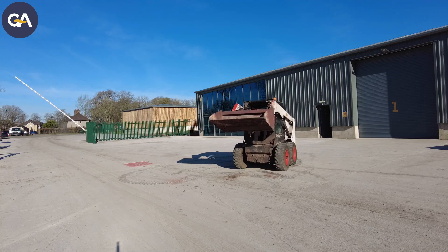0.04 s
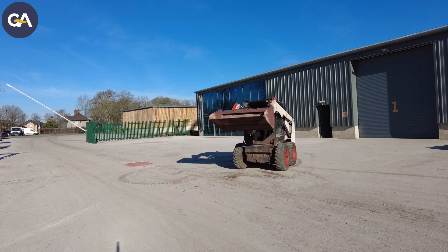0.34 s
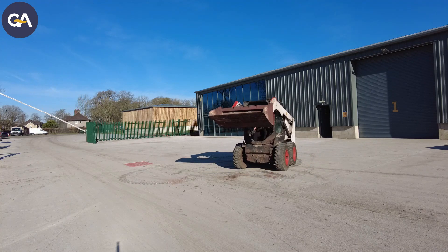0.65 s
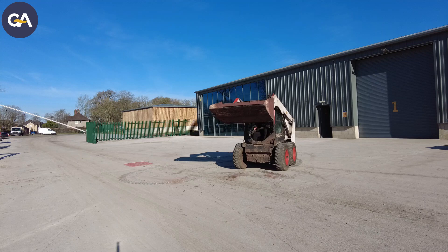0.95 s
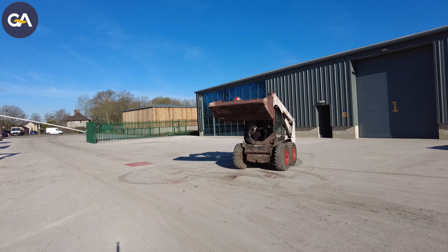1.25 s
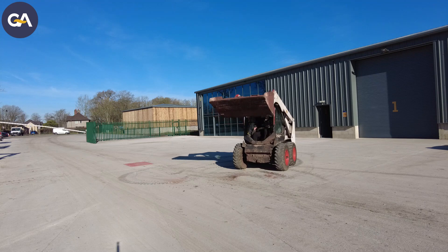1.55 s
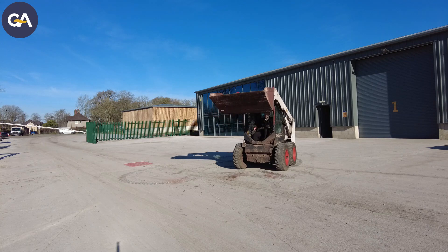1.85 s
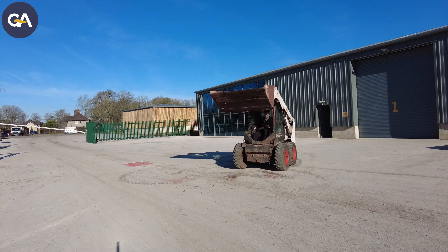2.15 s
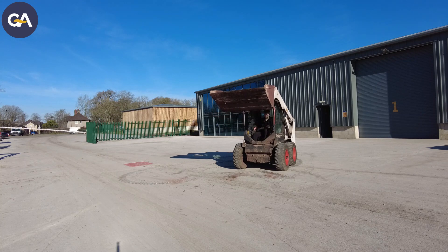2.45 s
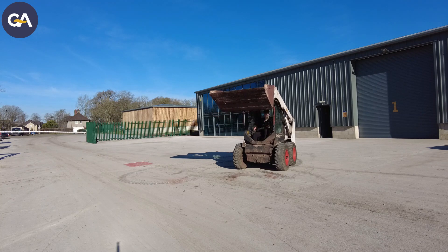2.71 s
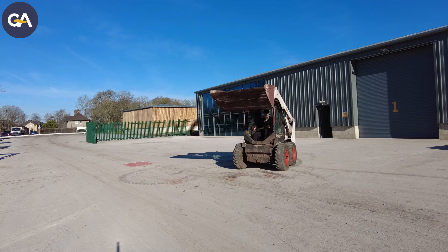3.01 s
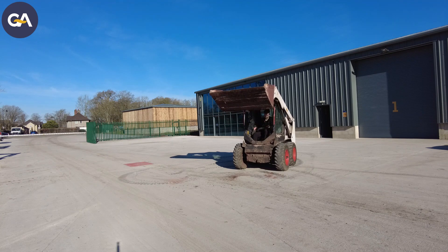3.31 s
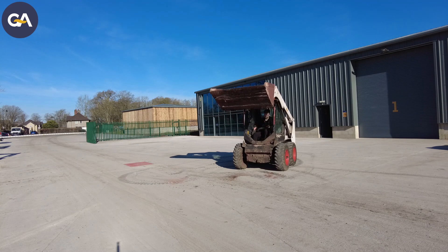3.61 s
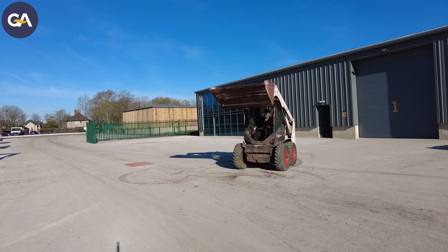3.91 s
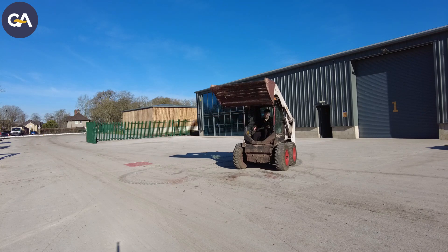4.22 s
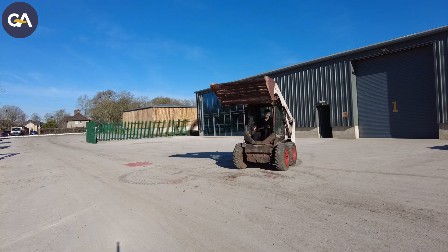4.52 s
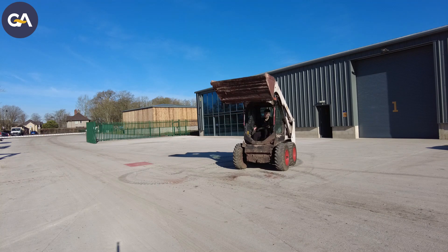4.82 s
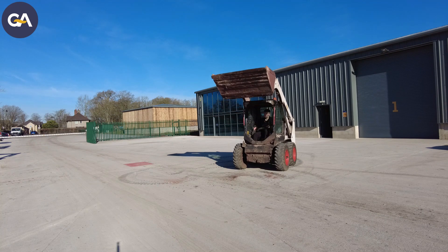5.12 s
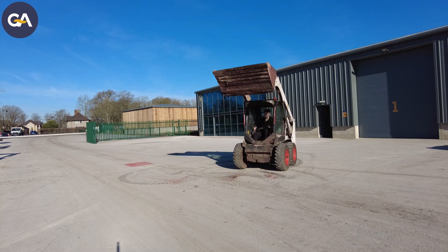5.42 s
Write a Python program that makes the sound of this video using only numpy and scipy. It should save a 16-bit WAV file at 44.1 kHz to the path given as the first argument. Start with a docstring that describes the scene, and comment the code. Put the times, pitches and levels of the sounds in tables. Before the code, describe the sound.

A diesel skid steer loader booms and revs up, its steel arms knocking and rattling before the hydraulics start to whine.

```python
"""A four-cylinder diesel skid steer lifts its bucket on a paved yard, its revs slowly climbing.
Each firing drives the exhaust's boom and the block's clatter; the boom eases as the load comes off.
The arms rattle, knock and clink against loose pins, grit ticks under the tyres and a faint hiss flickers.
Then the lift valve sings, the hydraulic pump whines and engine harmonics ring the steel panels.
A metal shed wall gives a short answer."""
import sys
import numpy as np
from scipy import signal
from scipy.fft import rfft, irfft, next_fast_len
from scipy.io import wavfile
from scipy.ndimage import uniform_filter1d, map_coordinates

SR = 44100
rng = np.random.default_rng(int(sys.argv[2]) if len(sys.argv) > 2 else 0)


def inscribe(sig):
    """Save sig as 16-bit PCM at rate SR to the path in sys.argv[1].

    A 1-D sig is mono; a 2-D sig holds one channel per row.
    Samples are clipped to [-1, 1] before scaling.
    """
    pcm = np.round(np.clip(np.atleast_2d(sig).T, -1, 1) * 32767)
    wavfile.write(sys.argv[1], SR, pcm.astype(np.int16))


N = 245195


def amp(db):
    """Decibels to gain."""
    return 10 ** (np.asarray(db) / 20)


def unit(x):
    """Scale to rms 1."""
    return x / np.sqrt(np.mean(x ** 2) + 1e-20)


def along(points, hz):
    """Read (Hz, value) points on a log frequency axis."""
    freqs, values = np.transpose(points)
    return np.interp(np.log(hz + 1), np.log(freqs + 1), values)


def automation(rows):
    """Join (seconds, value) points into one value per sample."""
    times, values = np.transpose(rows)
    return np.interp(np.arange(N) / SR, times, values)


def envelope(start, length, attack, release):
    """Rise, hold until length has passed, then die away; all in seconds."""
    t = np.arange(N) / SR - start
    return np.clip(t / attack, 0, 1) * np.exp(-np.maximum(t - length, 0) / release)


def swells(rows):
    """Bell-shaped rises of level."""
    t = np.arange(N) / SR
    return sum(amp(db) * np.exp(-((t - centre) / half) ** 2) for centre, half, db in rows)


def wobble(rate):
    """A smooth random curve, rate knots a second."""
    coarse = np.arange(0, N + 16, 16)
    curve = map_coordinates(rng.standard_normal(4096), [coarse * rate / SR], mode="wrap")
    return np.interp(np.arange(N), coarse, curve)


def filtered(x, response):
    """Filter x by a complex response of frequency."""
    size = next_fast_len(N + SR // 2)
    return irfft(rfft(x, size) * response(np.fft.rfftfreq(size, 1 / SR)), size)[..., :N]


def resonance(f, hz, width):
    """Causal response of one mode; width in Hz."""
    return 1j * f * width / (hz * hz - f * f + 1j * f * width)


# Stereo width. Each row: frequency in Hz, side level against the mid in dB.
WIDTH = [(60, -29.5), (125, -21.5), (250, -9), (500, -7), (1000, -2), (2000, -11), (4000, -1), (12000, -2)]

def spread(pair):
    """Two unrelated signals as mid and side: narrow bass, wide treble."""
    side = filtered(pair[1], lambda hz: amp(along(WIDTH, hz)))
    return np.array([pair[0] + side, pair[0] - side])


def rush(spectrum, gate):
    """Stereo noise let through by a gate, then coloured."""
    bursts = rng.standard_normal((2, N)) * gate
    return spread(unit(filtered(bursts, lambda hz: amp(along(spectrum, hz)))))


def tone(turns, drift, flutter_db, rate):
    """A sine of rms 1 whose phase (drift, in radians) and level waver."""
    phase = 2 * np.pi * (turns + rng.random()) + drift * wobble(rate)
    return unit(np.sin(phase) * amp(flutter_db * wobble(rate)))


def strokes(firings, decay, uneven_db, scatter_db):
    """A burst at each firing, its decay counted in firings; each cylinder has its own strength."""
    stroke = firings.astype(int)
    cylinder = np.array([1, -1, .5, -.5])[stroke % 4]
    size = amp(uneven_db * cylinder + scatter_db * rng.standard_normal(1024)[stroke])
    return unit(size * np.exp(-(firings % 1) / decay))


def roughness(firings, depth):
    """The shaft jerks once an engine cycle and shudders at random, which roughens a tone."""
    return unit(1 + depth * wobble(70) + depth * np.sin(2 * np.pi * firings / 4))


# The exhaust's harmonics. Each row: multiple of the four-firing cycle, relative level in dB when
# lugging, relative level in dB when running free.
ORDERS = [(2, -49, -46), (3, -39, -41), (5, -45, -44), (6, -50, -44), (7, -42, -45), (8, -30, -40.5),
          (9, -49, -41.5), (10, -51, -55), (11, -50, -47), (12, -38.5, -44), (13, -48, -49), (14, -56, -52),
          (15, -47, -51), (16, -53, -51), (17, -47.5, -56), (18, -57, -56), (19, -53, -61), (20, -53, -60),
          (21, -55, -62), (22, -54, -50), (23, -57, -62), (24, -53, -54), (26, -62, -57), (27, -56, -60),
          (28, -56, -50.5), (32, -63, -59), (33, -66, -55), (35, -66, -50), (36, -57, -55), (37, -66, -54)]
# The exhaust's noise, lugging and running free. Each row: frequency in Hz, relative level in dB.
RUMBLE_LUG = [(15, -11.5), (28, -1.5), (48, 1.5), (80, 0), (105, -1.5), (190, -2), (300, -9), (420, -9),
              (560, -12), (670, -11.5), (800, -11.5), (950, -23), (1400, -49), (3000, -75)]
RUMBLE_FREE = [(15, -12), (28, -4.5), (48, 1), (80, 0), (190, 0.5), (300, -7), (420, -9.5), (540, -12),
               (620, -12.5), (700, -9.5), (770, -7.5), (840, -23), (1400, -50), (3000, -75)]
BOOM_FREE_DB, BOOM_LUG_DB = -21, -10  # at load 0 and 1

def exhaust(firings, load):
    """Firings boom, louder and steadier under load; unequal cylinders add the whole cycle's harmonics."""
    free = np.clip(1 - load, 0, 1)
    boom_db = BOOM_FREE_DB + (BOOM_LUG_DB - BOOM_FREE_DB) * load
    boom = amp(boom_db) * tone(firings, drift=.018, flutter_db=.25, rate=13)
    boom *= 1 + .12 * free * wobble(45)  # flickers when running free
    harmonics = np.zeros(N)
    sway = np.array([wobble(6), wobble(8), wobble(13)])
    for multiple, lug_db, free_db in ORDERS:
        shift, swell = rng.standard_normal((2, 3)) @ sway
        phase = 2 * np.pi * (multiple * firings / 4 + rng.random()) + .12 * shift
        db = lug_db + (free_db - lug_db) * free + .9 * swell
        harmonics += np.sqrt(2) * amp(db) * np.sin(phase)
    puffs = 1 + .25 * strokes(firings, decay=.55, uneven_db=5.5, scatter_db=3)
    rumble = amp(-33) * np.sqrt(1 - free) * rush(RUMBLE_LUG, puffs)
    rumble += amp(-34) * np.sqrt(free) * rush(RUMBLE_FREE, puffs)
    # a low resonance beats against the boom
    throb = filtered(rng.standard_normal(N), lambda f: resonance(f, hz=48.4, width=7.8) ** 2)
    return boom + amp(-1) * harmonics + rumble + amp(-34) * unit(throb)


# The block's clatter and the hiss above it. Each row: frequency in Hz, relative level in dB.
BLOCK = [(300, -39), (600, -11.5), (800, -4.5), (950, -2.5), (1080, -1.5), (1310, -2), (1650, -3.5),
         (2000, -8), (2400, -9.5), (2900, -10), (3500, -19.5), (5000, -38), (9000, -72)]
HISS = [(1500, -39.5), (3300, -2.5), (4300, 0.5), (5100, -4.5), (5800, -1), (6050, -1), (6300, 0),
        (6600, -3.5), (6900, -12.5), (7600, -12.5), (8400, -16), (11000, -20), (13000, -20), (15500, -28)]
# The engine cover's peaks and hollows. Each row: centre in Hz, width in Hz, boost or cut in dB.
COVER = [(967, 16, 4), (1013, 25, 4), (1045, 41, -3), (1117, 22, 3.5), (1145, 55, -5), (1255, 34, 5.5),
         (1336, 34, 0.5), (1410, 34, -3.5), (1437, 26, 7), (1490, 30, 3), (1580, 26, 3), (1650, 30, 0.5),
         (1731, 17, 6), (3080, 45, 5.5)]
# The fader on the hiss. Each row: time in seconds, level in dB.
HISS_LEVEL = [(0, -52), (.65, -54), (.95, -55.5), (1.4, -54), (2.2, -54.5), (2.7, -53.5), (3.5, -53.5),
              (4.1, -54), (4.5, -53), (5.56, -52.5)]
BLOCK_DB, LOW_REVS_HZ, REV_DB_PER_OCTAVE = -43, 60, 3.06  # clatter at low revs, and its rise

def clatter(firings, speed, rattle):
    """Combustion knocks block and cover, louder with revs and shaking; valves and oil hiss above it."""
    level = np.hypot(amp(BLOCK_DB + REV_DB_PER_OCTAVE * np.log2(speed / LOW_REVS_HZ)), rattle)
    blows = strokes(firings, decay=.3, uneven_db=3, scatter_db=2)
    taps = strokes(firings, decay=.3, uneven_db=2.2, scatter_db=2)
    cover = lambda f: amp(sum(db * np.abs(resonance(f, hz, width)) ** 2 for hz, width, db in COVER))
    block = filtered(rush(BLOCK, 1 + .17 * blows), cover)
    hiss_db = automation(HISS_LEVEL) + .5 * wobble(6.2)
    return level * block + amp(hiss_db) * rush(HISS, 1 + .2 * taps)


# The colour of the flickering hiss. Each row: frequency in Hz, relative level in dB.
FLICKER = [(4000, -19.5), (7500, -3.5), (9400, 1.5), (11000, -1.5), (13000, -4), (15500, -10)]

def treble_flicker():
    """A faint, very high hiss flickers unevenly in level."""
    slow_db, fast_db = 3.5 * wobble(14), 4 * wobble(500)
    return amp(-69) * rush(FLICKER, amp(slow_db + fast_db))


# The clear ticks of grit. Each row: start in seconds, pitch in Hz, level in dB.
TICKS = [(.105, 5320, -40), (.135, 4350, -39), (.251, 5160, -44), (.844, 4500, -36),  (1.215, 5450, -45),
         (2.016, 4480, -41), (2.237, 5510, -44), (2.43, 4450, -43), (2.918, 4470, -41), (3.151, 4470, -43),
         (3.168, 5510, -43), (3.751, 4470, -40), (3.97, 5510, -44), (4.488, 4650, -41), (4.512, 4650, -40),
         (5.231, 4470, -42), (5.425, 5510, -43)]
TICK_ATTACK_S, TICK_T60_S, ROLL_END_S = .002, .04, 3.6

def grit():
    """Grit snaps under the tyres in dry, pitched ticks: a few clear, many faint while the wheels roll."""
    faint = [(when * ROLL_END_S, 3950 + 2080 * pitch, -45 - 5 * softness)
             for when, pitch, softness in rng.random((60, 3))]
    t = np.arange(SR // 16) / SR
    out = np.zeros((2, N + SR))
    for start, hz, db in TICKS + faint:
        phases = 2 * np.pi * rng.random((2, 1))
        scratch = 3 * uniform_filter1d(rng.standard_normal((2, len(t))), size=24)
        shape = (1 - np.exp(-t / TICK_ATTACK_S)) * amp(db - 60 * t / TICK_T60_S)
        out[:, round(start * SR):][:, :len(t)] += shape * np.sin(2 * np.pi * hz * t + phases + scratch)
    return spread(out[:, :N])


# Bouts of shaking. Each row: start in seconds, length in seconds, linkage chatter in dB,
# engine cover rattle in dB.
SHAKES = [(0.158, 0.54, -61.5, -50), (0.808, .06, -55, -46.5), (1.341, 0.14, -54, -47.5),
          (1.819, 0.12, -52, -45.5), (2.296, .1, -51.5, -48), (2.544, .24, -55, -45),
          (3.188, .38, -51.5, -44), (3.803, 0.08, -55, -54)]

def shaking():
    """The arms shake in bouts: one gain curve for the linkage's chatter, one for the cover's rattle."""
    return sum(amp([[chatter_db], [cover_db]]) * envelope(start, length, attack=.0067, release=.034)
               for start, length, chatter_db, cover_db in SHAKES)


# The ring of the steel arms. Each row: pitch in Hz, width in Hz, relative level in dB.
STEEL = [(1100, 50, -2), (2090, 260, -1), (2690, 77, 6.5), (3150, 320, 2), (4010, 170, -1),
         (4970, 520, -2.5), (5650, 330, -3), (6130, 180, -4), (7600, 170, -2.5), (7950, 300, -10.5),
         (9100, 350, -12), (9330, 160, -9), (11200, 870, -17.5), (12400, 900, -23), (14300, 1500, -25)]

def steel(f, scatter_db):
    """Response of the linkage; the strength of each mode varies with where it is struck."""
    return sum((-1) ** k * amp(db + scatter_db * rng.standard_normal()) * resonance(f, hz, width)
               for k, (hz, width, db) in enumerate(STEEL))


CONTACTS_PER_S, CONTACT_DECAY_S, CHATTER_REST_DB = 170, .0038, -61

def linkage(chatter):
    """Loose pins chatter in the steel arms, faintly even between bouts of shaking."""
    contacts = (rng.random(N) < CONTACTS_PER_S / SR) * rng.uniform(.27, 1, N)
    bursts = signal.lfilter([1], [1, -np.exp(-1 / (CONTACT_DECAY_S * SR))], contacts)
    force = np.hypot(amp(CHATTER_REST_DB), chatter) * unit(bursts + .08)
    force = uniform_filter1d(force, size=200)  # greased contacts close softly
    ring = filtered(force * rng.standard_normal((2, N)), lambda f: steel(f, scatter_db=0))
    return spread(unit(ring) * np.sqrt(np.mean(force ** 2)))


# Knocks in the arms. Each row: start in seconds, level in dB, brightness in dB per octave.
KNOCKS = [(0.802, -40.5, 1.5), (1.849, -44.5, -2), (1.914, -51.5, 1), (2.054, -56, 8.5),
          (2.3053, -39.5, -1), (2.3352, -44.5, -1), (2.367, -45.5, -0.5), (2.493, -46.5, 1.5),
          (2.553, -48, 1.5), (2.585, -48, -2.5), (2.645, -45, 0.5), (2.696, -44, -3), (2.742, -46.5, 1),
          (2.8604, -51.5, 0.5), (2.919, -54.5, 0), (3.066, -55.5, 8.5), (3.19, -49, 2), (3.403, -50.5, 0),
          (3.824, -52.5, 6)]
KNOCK_ATTACK_S, KNOCK_DECAY_S = .0015, .018

def knocks():
    """The arms jolt against their pins; each blow rings the steel with a colour of its own."""
    t = np.arange(SR // 10) / SR
    f = np.fft.rfftfreq(len(t), 1 / SR)
    blow = np.clip(t / KNOCK_ATTACK_S, 0, 1) * np.exp(-t / KNOCK_DECAY_S)
    out = np.zeros((2, N + SR))
    for start, db, bright_db in KNOCKS:
        colour = steel(f, scatter_db=4) * amp(bright_db * np.log2((f + 1) / 5000))
        colour /= np.sqrt(np.mean(np.abs(colour) ** 2))
        burst = blow * rng.standard_normal((2, len(t)))
        out[:, round(start * SR):][:, :len(t)] += amp(db) * irfft(rfft(burst) * colour, len(t))
    return spread(out[:, :N])


# The ring of a loose pin. Each row: pitch in Hz, width in Hz, relative level in dB.
PIN = [(4010, 140, 2.5), (5600, 200, -4), (7820, 130, -7.5), (10400, 300, -15.5), (12300, 300, -24),
       (13400, 300, -22)]
# Its clinks. Each row: start in seconds, level in dB.
CLINKS = [(3.215, -48), (3.253, -52), (3.294, -52), (3.84, -54)]

def clinks():
    """A loose steel pin scrapes and jingles as the lift takes up its slack; its modes ring roughly."""
    force = sum(amp(db) * envelope(start, length=.014, attack=.014, release=.035) for start, db in CLINKS)
    pin = lambda f: sum(amp(db) * resonance(f, hz, width) for hz, width, db in PIN)
    return spread(force * unit(filtered(rng.standard_normal((2, N)), pin)))


# The hiss of the oil jet. Each row: centre in Hz, width in Hz, relative level in dB.
JET = [(5700, 160, -4.5), (6220, 160, 1.5), (10600, 1200, -24.5)]
VALVE_START_S, VALVE_OPENING_S, VALVE_HZ, JET_RISE_S = 3.3, .3, 685, .91

def valve():
    """The lift valve sings roughly as it opens, then faintly, and hisses louder as the oil flow grows."""
    t = np.arange(N) / SR
    opening = amp(-41) * envelope(VALVE_START_S, VALVE_OPENING_S, attack=.077, release=.025)
    held = amp(-53) * np.clip((t - VALVE_START_S) / VALVE_OPENING_S, 0, 1)
    song = (opening + held) * tone(VALVE_HZ * t, drift=.6, flutter_db=2, rate=35)
    flow = np.clip((t - VALVE_START_S) / JET_RISE_S, .25, 1)  # a quarter remains with the valve shut
    colour = lambda f: sum(amp(db) * resonance(f, hz, width) ** 2 for hz, width, db in JET)
    jet = filtered(rng.standard_normal((2, N)), colour)
    return song + amp(-60.5) * flow * spread(unit(jet))


# Oil pressure surges in the whine, and swells in the hum. Each row: centre in seconds,
# half length in seconds, level in dB.
SURGES = [(3.5, 0.04, -38), (3.595, 0.03, -35.5), (3.827, 0.027, -35), (3.926, 0.028, -34.5),
          (4.04, 0.04, -33), (4.13, 0.03, -34.5), (4.22, 0.04, -37.5), (4.35, .04, -40), (4.49, .04, -38),
          (4.65, 0.07, -39)]
HUM_SWELLS = [(3.88, .2, -46), (4.48, .2, -46), (4.72, .07, -43), (5.38, .14, -47)]
PUMP_STROKES_PER_FIRING = 4.8

def pump(firings):
    """The pump hums at its stroke rate and whines an octave up; its gears sing as the bucket tips."""
    turns = PUMP_STROKES_PER_FIRING * firings
    lift = amp(-44) * envelope(start=3.5, length=1.68, attack=.14, release=.4)
    whine = np.hypot(lift, swells(SURGES)) * tone(2 * turns, drift=.38, flutter_db=1.2, rate=36)
    stroke = tone(turns, drift=.3, flutter_db=2, rate=30)
    body = lambda f: amp(-54) + amp(-48) * np.abs(resonance(f, hz=341, width=69)) ** 2
    hum = filtered(stroke, body) + swells(HUM_SWELLS) * stroke
    tilt = amp(-40.5) * envelope(start=4.86, length=.1, attack=.05, release=1.3)
    gears = tilt * tone(8 * firings, drift=.25, flutter_db=1.5, rate=28)
    return (whine + hum + gears) * roughness(firings, depth=.22)


# The fader on the high panel's ring. Each row: time in seconds, boost or cut in dB.
RING_LEVEL = [(0, -2), (3.6, -2), (3.9, 1.5), (4.7, -2), (5.0, 0), (5.45, 3.5)]

def panels(firings):
    """A low steel panel drones during the climb; firing harmonics sweep through a high one's mode."""
    drone = tone(3 * firings, drift=.25, flutter_db=2, rate=24) * roughness(firings, depth=.3)
    climb = amp(-37) * envelope(start=3.68, length=.93, attack=.066, release=.06)
    harmonics = sum(amp(-.5 * (k - 16)) * tone(k * firings, drift=.45, flutter_db=1.5, rate=35)
                    for k in range(15, 23))
    ring = filtered(harmonics, lambda f: resonance(f, hz=1328, width=77) ** 2)
    return climb * drone + amp(-48.5 + automation(RING_LEVEL)) * ring


def shed_wall(x, t60, delay):
    """The ribbed shed wall scatters a short, late answer."""
    t = np.arange(SR // 2) / SR
    tail = rng.standard_normal((2, len(t))) * amp(-60 * t / t60) * (t > delay)
    return signal.fftconvolve(x, tail / np.linalg.norm(tail[0]), axes=1)[:, :N]


# The revs. Each row: time in seconds, cylinder firings per second.
SPEED = [(0.0, 61.6), (0.33, 59.5), (0.56, 61.3), (0.82, 59.7), (1.35, 60.0), (1.9, 61.7), (2.2, 64.0),
         (2.6, 66.3), (2.87, 62.3), (3.15, 64.9), (3.42, 66.1), (3.58, 70.5), (3.74, 73.5), (4.01, 73.6),
         (4.1, 75.5), (4.21, 78.6), (4.42, 79.2), (4.6, 78.5), (4.85, 81.4), (5.15, 81.8), (5.56, 83.3)]
# How hard the engine works. Each row: time in seconds, load (near 1 lugging, near 0 running free).
LOAD = [(0, 0.94), (.4, 0.84), (1.3, 0.83), (1.85, 0.99), (2.25, 0.86), (3.47, 0.9), (3.56, 0.44),
        (3.68, 0.46), (3.72, -0.059), (4.1, -0.21), (4.25, 0.08), (4.45, -0.12)]

def scene():
    """Engine, pump and panels follow one count of firings; the wall answers bright sounds and tones."""
    speed, load = automation(SPEED), automation(LOAD)
    firings = np.cumsum(speed) / SR
    chatter, rattle = shaking()
    bright = linkage(chatter) + knocks() + clinks() + grit() + treble_flicker()
    tones = pump(firings) + valve() + panels(firings)
    answer = shed_wall(amp(-9) * bright + amp(-17) * tones, t60=.3, delay=.02)
    return exhaust(firings, load) + clatter(firings, speed, rattle) + tones + bright + answer


# The stereo balance. Each row: frequency in Hz, left level against the right in dB.
LEAN = [(60, -1.1), (130, 0.4), (600, 0.5), (2000, -0.2), (4000, -2), (9000, -0.5)]
# The lag between the sides. Each row: frequency in Hz, radians by which the left trails.
LAG = [(60, 0.027), (250, 0.15), (800, 0.94), (1460, 0), (3000, 0.81), (6000, 0.44), (9500, .8),
       (13000, 1.4)]
TOP_HZ = 15700

def record(dry):
    """Level and phase place the machine slightly to the right; the very top of the treble is cut."""
    sides = np.array([[.5], [-.5]])
    placed = lambda hz: amp(along(LEAN, hz) * sides) * np.exp(-1j * along(LAG, hz) * sides)
    return filtered(dry, lambda hz: placed(hz) * (hz < TOP_HZ))


dry = scene()
out = record(dry)
inscribe(out)
```